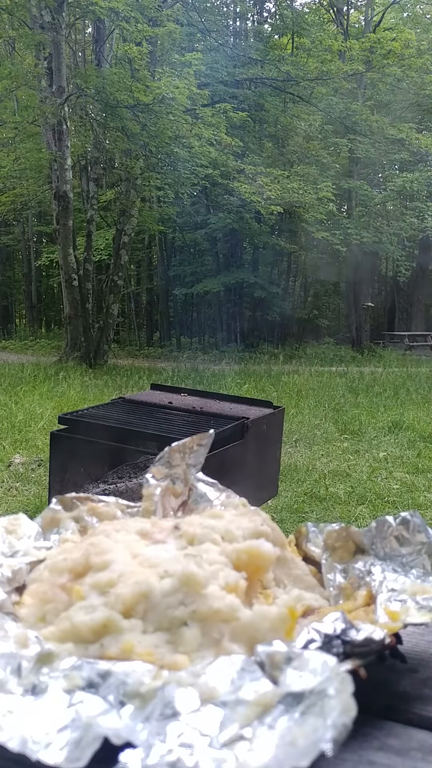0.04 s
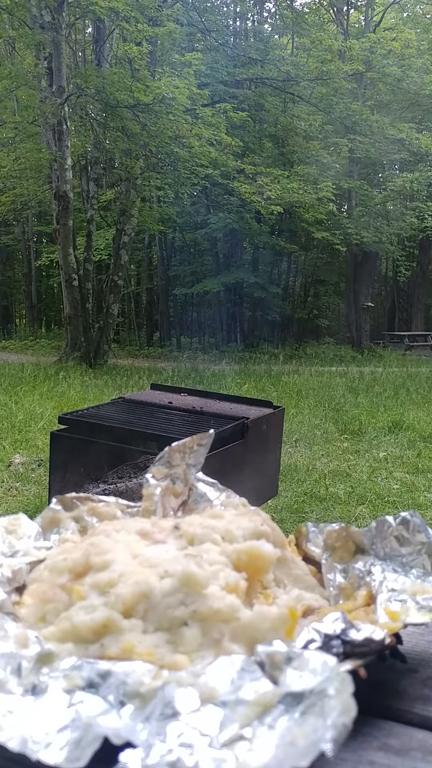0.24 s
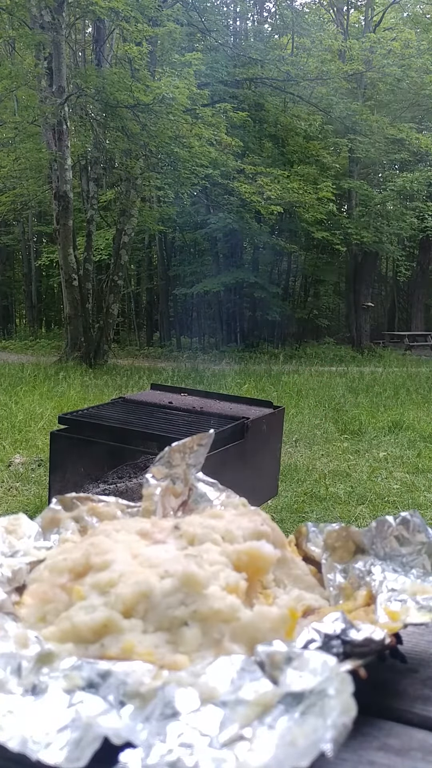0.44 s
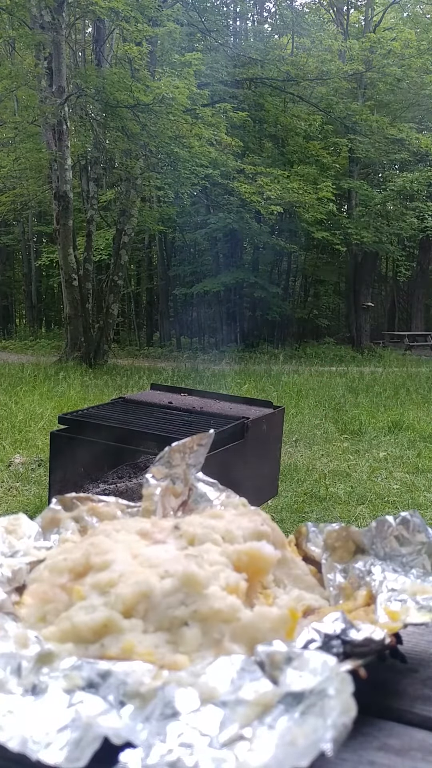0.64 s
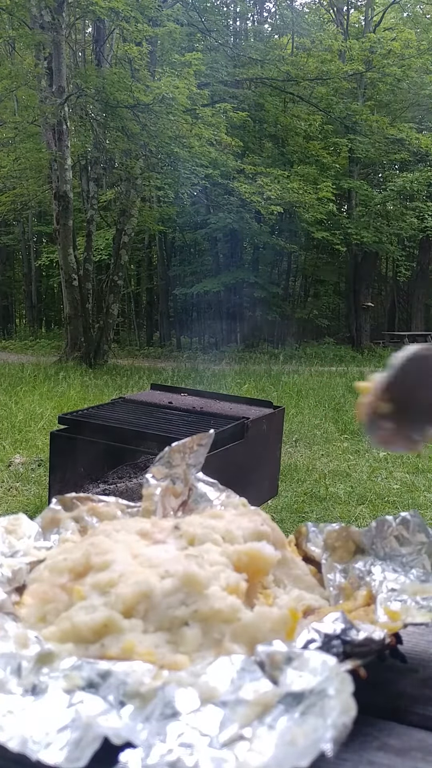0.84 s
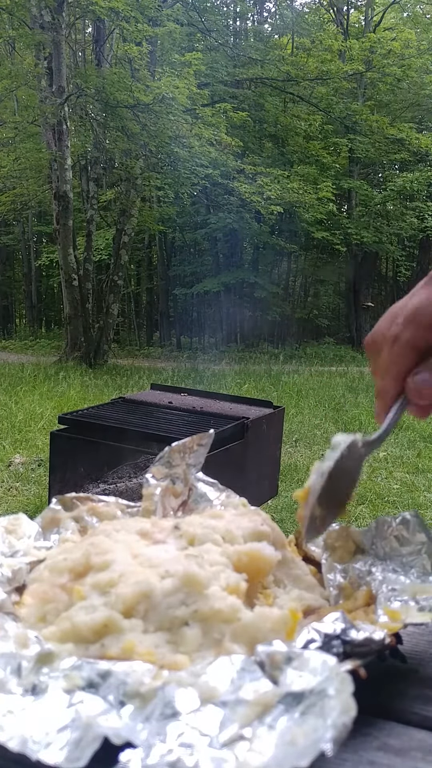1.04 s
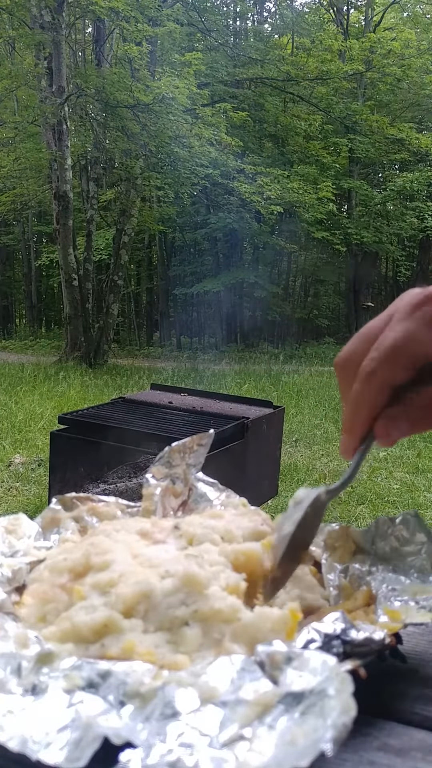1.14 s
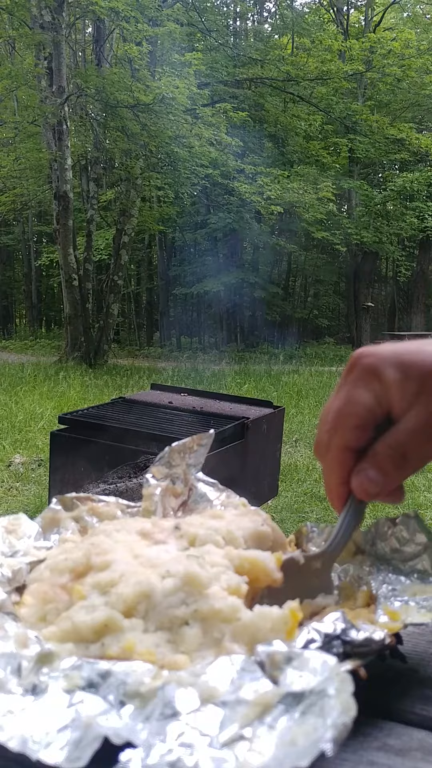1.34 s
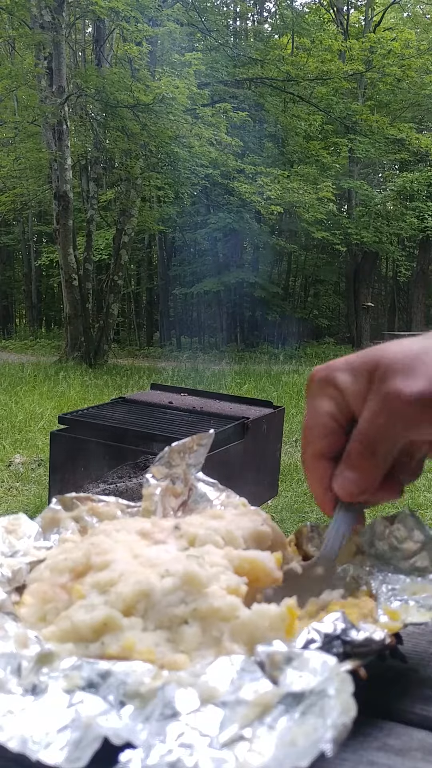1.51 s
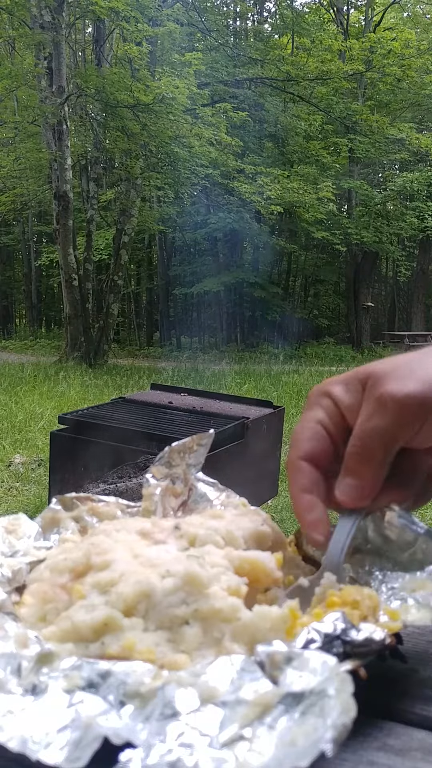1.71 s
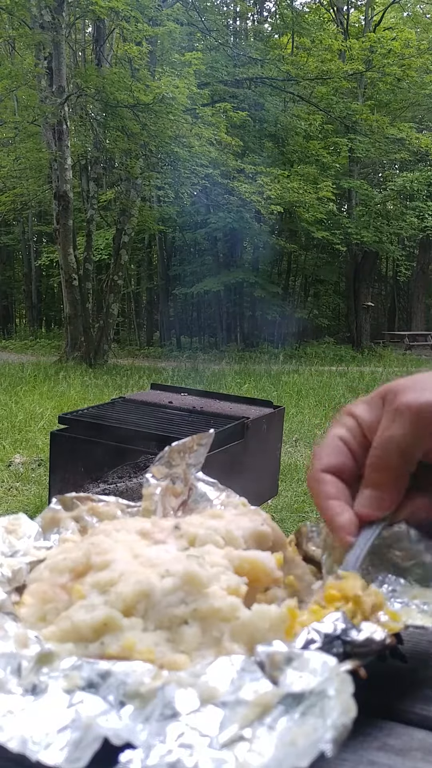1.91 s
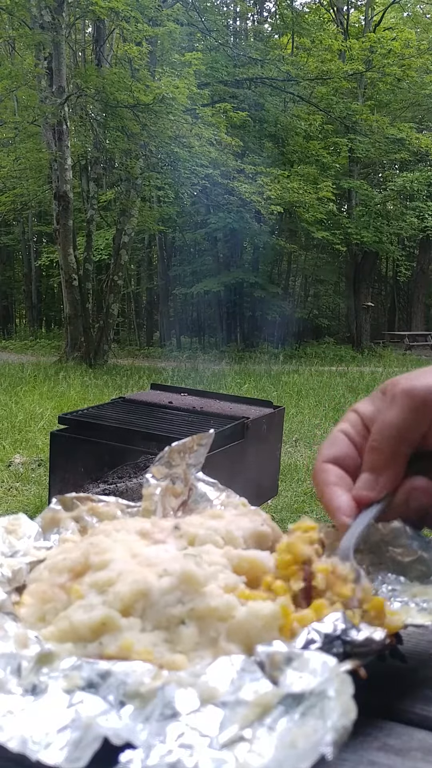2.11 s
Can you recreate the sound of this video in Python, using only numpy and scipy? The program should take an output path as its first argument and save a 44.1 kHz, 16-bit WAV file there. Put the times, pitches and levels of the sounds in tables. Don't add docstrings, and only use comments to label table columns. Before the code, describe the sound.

A spoon knocks loudly on a wooden table, then digs into food in crackling foil

```python
import sys
import numpy as np
from scipy import signal
from scipy.fft import rfft, irfft
from scipy.io import wavfile
from scipy.ndimage import uniform_filter1d

SR = 44100
rng = np.random.default_rng(int(sys.argv[2]) if len(sys.argv) > 2 else 0)


def wav_record(signal):
    frames = np.transpose(np.atleast_2d(signal))
    bounded = np.clip(frames, -1, 1)
    quanta = np.round(bounded * 32767).astype(np.int16)
    wavfile.write(sys.argv[1], SR, quanta)


def how_loud(loudness_db):
    steps = np.asarray(loudness_db, float) / 20
    return 10 ** steps


N = 94815
T = np.arange(N) / SR

# pitch_hz [Hz], level_db [dB per Hz]
SNAP_COLOUR = [(300, -39), (1500, -15), (4000, -5), (6800, -18), (8500, -3), (9700, -6.5), (10500, -26),
               (16000, -24)]


def curve(table, x, log=False):
    points = np.array(table, float)
    scale = np.log if log else np.asarray
    return np.interp(scale(x), scale(points[:, 0]), points[:, 1])


def colour(x, table):
    hz = np.maximum(np.fft.rfftfreq(N, 1 / SR), 1)
    gain = how_loud(curve(table, hz, log=True))
    return irfft(rfft(x) * gain / np.sqrt(np.mean(gain ** 2)), N)


def band_pass(x, edges_hz):
    return signal.sosfilt(signal.butter(2, edges_hz, "band", fs=SR, output="sos"), x)


def ring(x, hz, t60):
    pole = np.exp(2j * np.pi * hz / SR - np.log(1000) / (max(t60, 1e-3) * SR))
    return signal.lfilter([1], [1, -pole], x).imag


def push(start_s, length_s):
    length_s = max(length_s, 1e-4)
    u = (T - start_s) / length_s
    return np.where((u > 0) & (u < 1), np.sin(np.pi * u) ** 2, 0) * 2 / (length_s * SR)


def fade(start_s, t60):
    return (T > start_s) * how_loud(-60 * np.abs(T - start_s) / t60)


def pan(db):
    return how_loud(np.array([[db / 2], [-db / 2]]))


def walk(rate_hz):
    k = int(SR / rate_hz)
    steps = np.repeat(rng.standard_normal(N // k + 1), k)
    return 1.6 * uniform_filter1d(uniform_filter1d(steps, k), k)[:N]


def knock():
    # pitch_hz [Hz], t60_s [s], left_swing [gain], right_swing [gain]
    board_modes = [(317, 0.124, 0.083, 0.041), (496, 0.06, -0.131, -0.062), (600, 0.04, -0.08, -0.12),
                   (692, 0.17, 0.05, 0.07), (802, 0.085, -0.083, -0.163), (906, 0.094, -0.179, -0.347),
                   (980, 0.061, -0.053, -0.209), (1115, 0.064, -0.05, -0.249), (1337, 0.055, 0.322, 0.045),
                   (1458, 0.025, -0.375, -0.339), (1547, 0.043, 0.889, 0.557), (1797, 0.034, -0.146, 0.299),
                   (2173, 0.023, -0.43, 0.083), (3134, 0.059, 0.136, 0.167)]
    # pitch_hz [Hz], level_db [dB per Hz]
    echo_colour = [(150, -1), (500, -8), (1600, 1), (2200, -10.5), (2600, -16), (3200, -12.5),
                   (4000, -29.5), (9000, -49.5)]
    # pitch_hz [Hz], level_db [dB], t60_s [s]
    hum_modes = [(900, -22.5, 0.059), (1300, -18.5, .025), (1540, -18.5, 0.096), (2010, -22.5, 0.034),
                 (2180, -24.5, .025)]
    knock_s, push_s, right_lag_s = .24272, .0004, .00006
    echo_gain = how_loud(-35)

    blows = np.array([push(knock_s, push_s), push(knock_s + right_lag_s, push_s)])
    board = sum(np.array([[left], [right]]) * ring(blows, hz, t60) for hz, t60, left, right in board_modes)
    thud_hz, thud_t60_s = 143, .25
    thud = ring(blows, thud_hz, thud_t60_s) + 0.99 * ring(blows, 0.14 * thud_hz, thud_t60_s)
    body = how_loud(-42) * pan(2.4) * thud
    body = body + how_loud(-12.5) * pan(9.5) * ring(blows, 2520, .02)
    body = body - how_loud(-9) * pan(8.9) * ring(blows, 2117.5, 0.018)

    contact_s = knock_s + 0.00022
    graze = 0.45 * fade(contact_s - .002, 0.15) * (T < contact_s)
    crack = how_loud(-17) * (fade(contact_s, .014) + graze)
    rattle = how_loud(-40.5) * fade(contact_s, .16)
    contact = (crack + rattle) * np.array([[1], [how_loud(-19)]])

    echo_rise_s, hum_rise_s = 0.037, .13
    wash = fade(knock_s, 0.42) * (1 - np.exp(-((T - knock_s) / echo_rise_s) ** 2)) * echo_gain
    wash = wash + how_loud(-15) * fade(contact_s, .07)
    wash = wash + how_loud(-50.5) * (T > .228) * (T < knock_s)
    swell = fade(knock_s, .5) * (1 - np.exp(-((T - knock_s) / hum_rise_s) ** 2)) * echo_gain
    swell = swell * rng.standard_normal((2, N))
    hum = sum(how_loud(db) * ring(swell, hz, t60) for hz, db, t60 in hum_modes)

    heard = how_loud(1.3) * board + body + hum
    heard = heard + colour(rng.standard_normal((2, N)) * contact, SNAP_COLOUR)
    heard = heard + colour(rng.standard_normal((2, N)) * wash * how_loud(1.8 * walk(60)), echo_colour)
    return signal.sosfilt(signal.butter(8, 9900, fs=SR, output="sos"), heard)


def bump():
    # start_s [s], level_db [dB], push_s [s]
    landings = [
        (.6148, -50, 0.0014),
        (.6195, -50, 0.0012),
        (.6245, -48.5, 0.0019),
        (.629, -52.5, 0.0022),
        (.641, -52, 0.0014),
        (.653, -69, 0.0011),
    ]
    # pitch_hz [Hz], level_db [dB], t60_s [s]
    dull_modes = [(162.3, 0.5, 0.054), (385, 3, 0.028), (680, 4.5, 0.018), (885, 4.5, 0.018),
                  (1410, -3.5, 0.014), (2650, -20, 0.022)]
    drive = 0
    for start_s, db, push_s in landings:
        brush = how_loud(-27) * fade(start_s, 0.044) * rng.standard_normal(N)
        drive = drive + how_loud(db) * (push(start_s, push_s) + brush)
    return pan(-7.5) * sum(how_loud(db) * ring(drive, hz, t60) for hz, db, t60 in dull_modes)


def dish():
    # pitch_hz [Hz], level_db [dB], t60_s [s]
    dish_modes = [(407, -4.5, 0.062), (778, 3.5, 0.039), (977, -1, 0.039), (1599, -2, 0.045),
                  (2250, -18, 0.04), (2700, -14, .025), (3164, -24.5, 0.02), (3510, -23, .045),
                  (5360, -37, 0.096), (660, -18.5, 0.065)]
    # start_s [s], level_db [dB], push_s [s], left_right_db [dB]
    set_downs = [
        (0.9022, -27, 0.00079, -10),
    ]
    # time_s [s], level_db [dB]
    slide = [(.64, -77), (.68, -78.5), (.76, -67.5), (.82, -76), (.845, -61.5), (.87, -51), (.90, -49),
             (.95, -64.5), (.99, -82)]
    rasp_edges_hz = [90, 450]
    taps = 0
    for start_s, db, push_s, side_db in set_downs:
        scuff = how_loud(-30.5) * fade(start_s, 0.079) * rng.standard_normal(N)
        taps = taps + how_loud(db) * pan(side_db) * (push(start_s, push_s) + scuff)
    sliding = (T > slide[0][0]) * (T < slide[-1][0])
    rub = rng.standard_normal(N) * how_loud(curve(slide, T) + 1.6 * walk(87)) * sliding
    drive = taps + pan(-8.5) * how_loud(-29.0) * rub
    out = how_loud(-11.5) * ring(drive, 173, .045)
    out = out + how_loud(17.5) * pan(-6.5) * band_pass(rub, rasp_edges_hz)
    for k, (hz, db, t60) in enumerate(dish_modes):
        out = out + (-1) ** k * how_loud(db) * ring(drive, hz, t60)
    return out


def foil():
    # start_s [s], level_db [dB], pitch_hz [Hz], t60_s [s], left_right_db [dB]
    pops = [(1.245, -61, 910, 0.058, -11), (1.322, -46, 723, 0.033, -5), (1.322, -48, 1674, 0.023, 8),
            (1.326, -53.5, 147, 0.42, -16), (1.381, -59.5, 796, 0.016, -14), (1.456, -52, 2085, 0.095, -3),
            (1.464, -48, 2700, 0.0094, 28), (1.470, -38, 2133, 0.036, -11.5),
            (1.492, -43.5, 1388, 0.069, 9.5), (1.648, -51.5, 638, 0.12, -5), (1.661, -55, 670, 0.074, 13),
            (1.682, -38.5, 744, 0.062, -5.5), (1.685, -43.5, 1330, 0.01, -13), (1.688, -44, 764, 0.029, 6),
            (1.796, -56.5, 625, 0.08, -2), (1.833, -60.5, 846, 0.1, -19), (1.878, -59.5, 800, 0.034, -13)]
    # start_s [s], level_db [dB], right_reach_db [dB]
    crease_snaps = [(0.2852, -24, -36.5), (0.617, -49, -9), (0.9025, -50.5, -36), (1.296, -60.5, -5),
                    (1.31, -45, -18), (1.433, -68.5, 5), (1.456, -50, -1), (1.466, -60, -4),
                    (1.47, -44, -10), (1.496, -47, -7), (1.555, -67, 8), (1.564, -68, 9),
                    (1.671, -47, -6.5), (1.676, -31, -31), (1.797, -52, -10), (1.8, -38.5, 2)]
    # pitch_hz [Hz], level_db [dB per Hz]
    sheet_colour = [(500, -4.5), (2000, -5), (3500, 0.5), (5500, 0), (7200, -5), (9500, -3), (10500, -18.5),
                    (16000, -12)]
    # pitch_hz [Hz], level_db [dB per Hz]
    scrape_colour = [(100, -29), (300, -0.5), (750, 1.5), (1400, -3.5), (2500, -11.5), (5000, -33)]
    spread = 0.096
    out = 0
    for start_s, db, hz, t60, side_db in pops:
        blow = push(start_s, 0.12 / hz)
        cluster = ring(blow, hz, t60) + 0.087 * ring(blow, hz * 0.73, 0.23 * t60)
        detune = rng.uniform(-1.09, 1, 2)
        for k, chance in ((-1, detune[0]), (1, detune[1])):
            side_hz = hz * np.exp(spread * (k + 0.87 * chance))
            cluster = cluster + 0.93 * ring(blow, side_hz, 1.15 * t60)
        rustle = band_pass(rng.standard_normal(N) * fade(start_s, 1.08 * t60), [hz / 0.86, hz * 1.73])
        rustle = how_loud(3) * np.sqrt(SR / hz / 8) * rustle
        out = out + how_loud(db - 6.0) * pan(side_db) * (cluster + rustle)

    snaps = sum(how_loud(db) * np.array([[1], [how_loud(right_db)]]) * fade(start_s, .006)
                for start_s, db, right_db in crease_snaps)
    shared, own = rng.standard_normal(N), rng.standard_normal((2, N))
    out = out + colour((0.35 * shared + 0.65 * own) * snaps, SNAP_COLOUR)
    out = out + crackle(column=1, colour_table=sheet_colour) * np.array([[1], [how_loud(-10)]])
    return out + crackle(column=2, colour_table=scrape_colour) * pan(-3.1)


def crackle(column, colour_table):
    # time_s [s], crackle_level_db [dB], scrape_level_db [dB]
    pressure = [(1.28, -81, -77), (1.314, -56.5, -76), (1.33, -64, -53.5), (1.375, -84, -66.5),
                (1.42, -76, -70.5), (1.465, -64.5, -51), (1.51, -70.5, -54.5), (1.56, -65.5, -62),
                (1.61, -81.5, -84.5), (1.642, -79, -71), (1.652, -62.5, -64.5), (1.685, -41.5, -55.5),
                (1.705, -65, -61), (1.78, -76.5, -91), (1.8, -44.5, -51.5), (1.85, -63, -61.5),
                (1.94, -66.5, -80.5), (2.0, -74, -71.5)]
    crease_edges_hz = [20, 4300, 7000, 10000, 18000]
    rate_per_s, scatter_db, swell_db, grain_s = 1500, 3, 2, 0.0016
    level = curve(np.array(pressure)[:, [0, column]], T)
    level = level - 100 * np.maximum(T - pressure[-1][0], 0)
    out = 0
    for edges in zip(crease_edges_hz, crease_edges_hz[1:]):
        clicks = (rng.random(N) < rate_per_s / SR) * how_loud(scatter_db * rng.exponential(size=N))
        grains = signal.lfilter([1], [1, -np.exp(-1 / (grain_s * SR))], clicks)
        grains = grains / np.sqrt(np.mean(grains ** 2))
        grains = grains * how_loud(level + swell_db * walk(70)) * (T > pressure[0][0])
        noise = 0.59 * rng.standard_normal(N) + .5 * rng.standard_normal((2, N))
        out = out + band_pass(noise * grains, edges)
    return colour(out, colour_table)


def ticks():
    # start_s [s], level_db [dB], pitch_hz [Hz], t60_s [s], left_right_db [dB]
    pitched_creases = [(1.284, -67, 7600, .02, 5.5), (1.297, -62, 3670, .03, -2),
                       (1.321, -59, 8300, 0.028, 9), (1.337, -64, 8740, .02, 8),
                       (1.478, -47, 2700, 0.024, 7), (1.555, -66, 8600, 0.013, 6),
                       (1.444, -54, 3100, 0.025, 10), (1.463, -46, 3450, 0.0089, 16),
                       (1.555, -56, 3530, 0.014, 1), (1.565, -59.5, 4500, 0.022, -4),
                       (1.65, -71, 8900, 0.018, 4.5), (1.666, -50.5, 8790, 0.034, 7),
                       (1.6734, -44.5, 5700, 0.025, 8), (1.6839, -41, 4820, 0.025, 7),
                       (1.786, -50, 5540, 0.0099, 7), (1.786, -55, 8750, 0.0078, 15),
                       (1.795, -51, 8900, 0.031, 12), (1.797, -58, 5060, 0.027, 9),
                       (1.811, -52.5, 4740, 0.026, -2), (1.824, -64, 8900, 0.023, 8),
                       (1.834, -55, 4770, 0.017, 0.5), (1.844, -53, 8200, 0.0067, 2),
                       (1.844, -56, 5070, 0.01, 1), (1.862, -55.5, 6000, 0.013, 11),
                       (1.870, -53, 8700, 0.017, 3), (1.871, -56.5, 4960, 0.059, 11),
                       (1.892, -55.5, 8300, 0.012, 1), (1.89, -59.5, 4940, 0.034, 3),
                       (1.91, -58.5, 4920, 0.026, 3), (1.9245, -57.5, 8400, 0.0083, 5),
                       (1.92, -58, 5900, 0.027, 4), (1.933, -56.5, 5680, 0.064, -1),
                       (1.932, -59, 8150, 0.026, -8), (1.962, -65.5, 4500, 0.015, -2),
                       (1.962, -63, 1780, 0.017, -0.5), (2.136, -61, 2760, 0.017, 0.5),
                       (2.134, -65, 5200, 0.014, 5), (.161, -62, 8530, 0.023, 13),
                       (1.778, -52.5, 8350, 0.019, 11)]
    width = 1.085
    out = 0
    for start_s, db, hz, t60, side_db in pitched_creases:
        noise = rng.standard_normal(N) + 0.5 * rng.standard_normal((2, N))
        burst = band_pass(noise * fade(start_s, t60), [hz / width, hz * width])
        out = out + how_loud(db) * pan(side_db) * np.sqrt(SR / hz) * burst
    return out


def mash():
    # time_s [s], level_db [dB]
    squelch = [(1.2, -104), (1.25, -60), (1.3, -83), (1.34, -56), (1.42, -62.5), (1.52, -59.5), (1.6, -72),
               (1.69, -64), (1.76, -84), (1.81, -68), (1.89, -70), (1.95, -102)]
    noise = rng.standard_normal(N) + .5 * rng.standard_normal((2, N))
    noise = signal.lfilter(*signal.butter(2, 172, fs=SR), noise)
    return noise / noise.std() * how_loud(curve(squelch, T) + 3.1 * walk(26.8)) * (T > squelch[0][0])


def air():
    # pitch_hz [Hz], level_db [dB per Hz]
    air_colour = [(20, -13), (55, 0), (150, -6.5), (350, -14), (1200, -16), (3000, -19), (9500, -22.5),
                  (16000, -27)]
    noise = colour(rng.standard_normal((3, N)), air_colour)
    low_pass = signal.butter(1, 410, fs=SR)
    own, shared = signal.lfilter(*low_pass, noise[:2]), signal.lfilter(*low_pass, noise[2])
    rumble = (3.3 * own + 0.27 * shared) * how_loud(0.5 * walk(2.1))
    whine_hz, whine_db, swell_db, throb_hz, peak_s, end_s = 1885, -84, 6, 11.5, .085, .24
    throb_db = swell_db * np.cos(2 * np.pi * throb_hz * (T - peak_s))
    whine = how_loud(whine_db + throb_db + 2 * walk(60)) * np.sin(2 * np.pi * whine_hz * T) * (T < end_s)
    return how_loud(-71.5) * (noise[:2] - own + rumble) + whine


def scene():
    # pitch_hz [Hz], width_hz [Hz], lift_db [dB]
    ports = [
        (8210, 310, 8),
        (5028, 3100, -9),
    ]
    near = knock() + bump() + dish() + foil() + ticks() + mash()
    for k, (hz, width_hz, lift_db) in enumerate(ports):
        resonance = signal.lfilter(*signal.iirpeak(hz, hz / width_hz, SR), near[k])
        near[k] = near[k] + how_loud(lift_db) * resonance
    return signal.lfilter(*signal.butter(2, 49, "high", fs=SR), near) + air()


def top_cut(x):
    return signal.sosfilt(signal.butter(12, 16050, fs=SR, output="sos"), x)


def record(dry):
    knee = 6
    mix = dry / (1 + np.abs(dry) ** knee) ** (1 / knee)
    return top_cut(mix)


dry = scene()
out = record(dry)
wav_record(out)
```